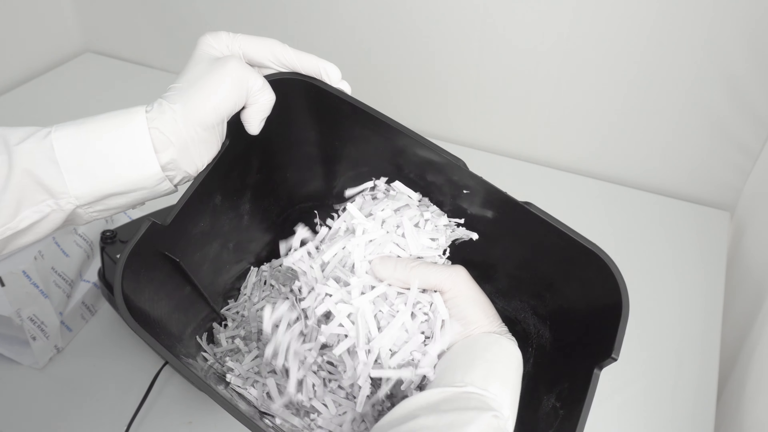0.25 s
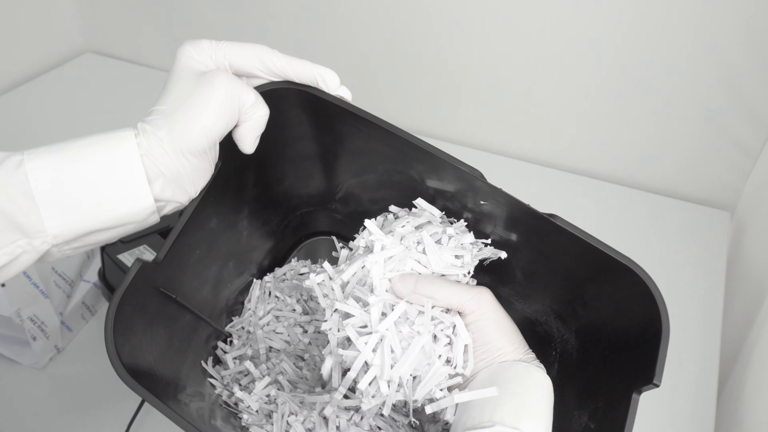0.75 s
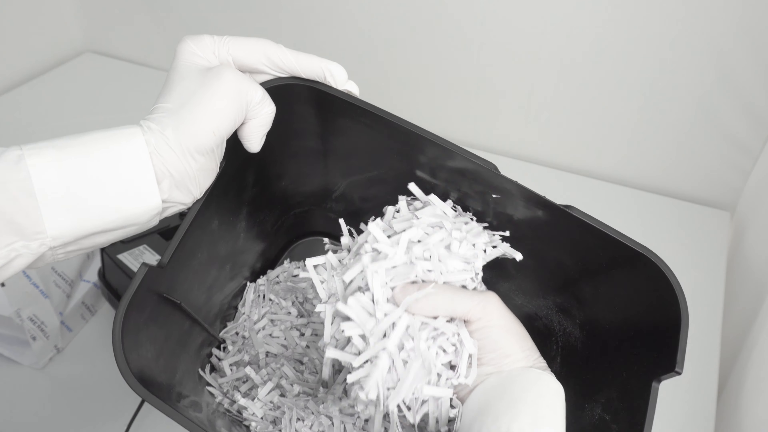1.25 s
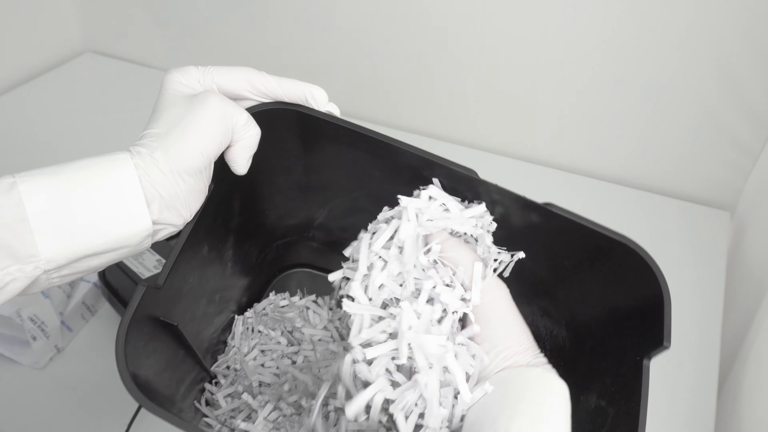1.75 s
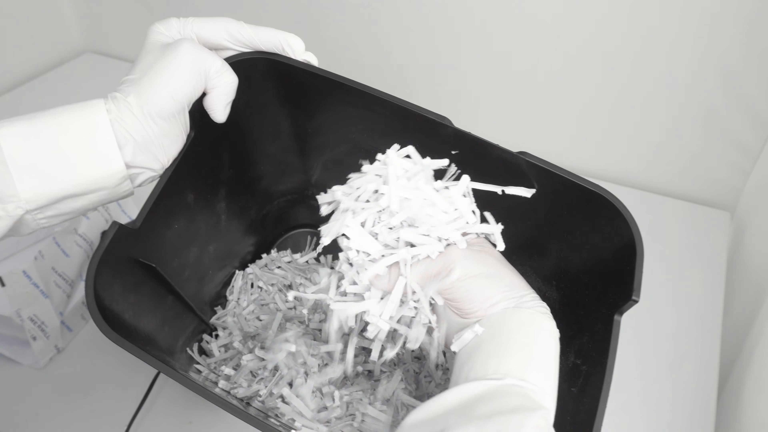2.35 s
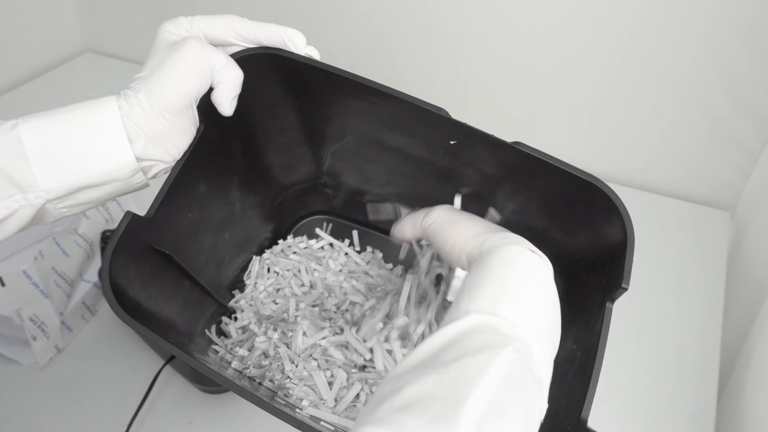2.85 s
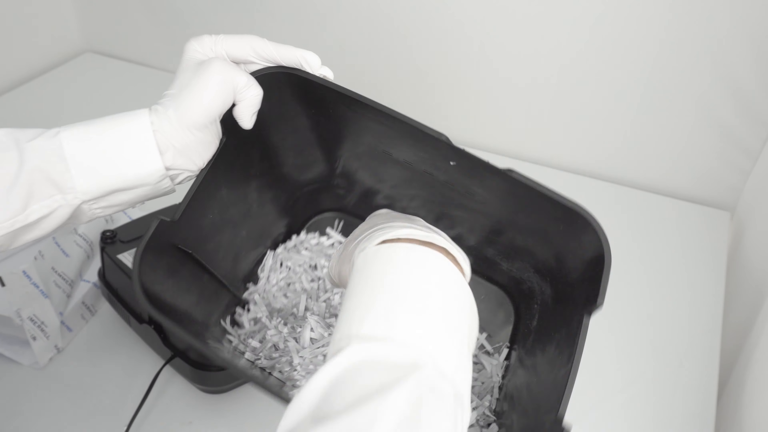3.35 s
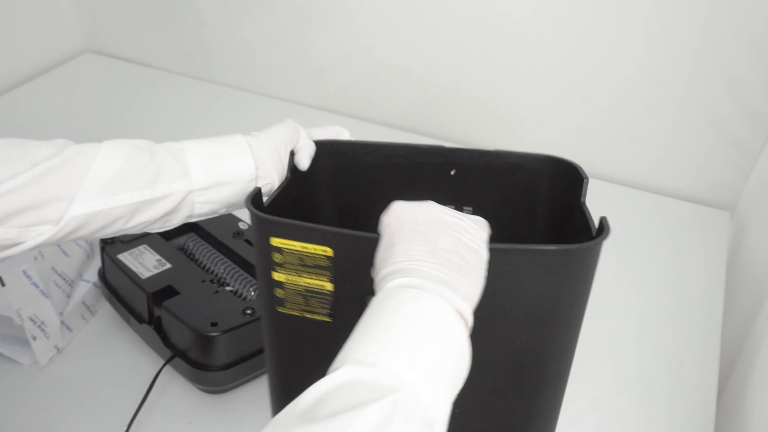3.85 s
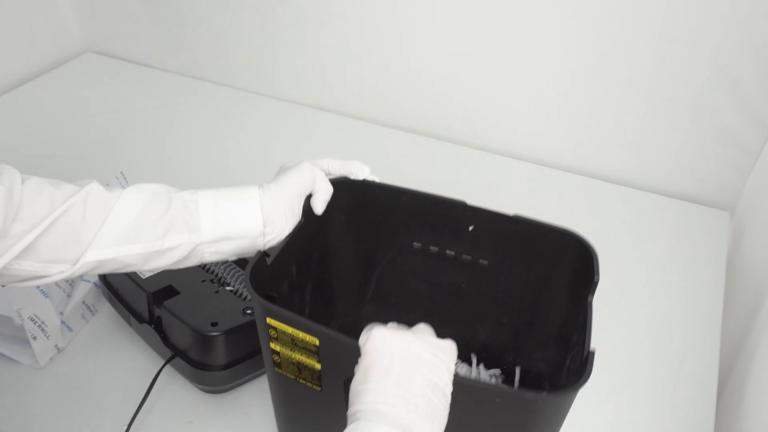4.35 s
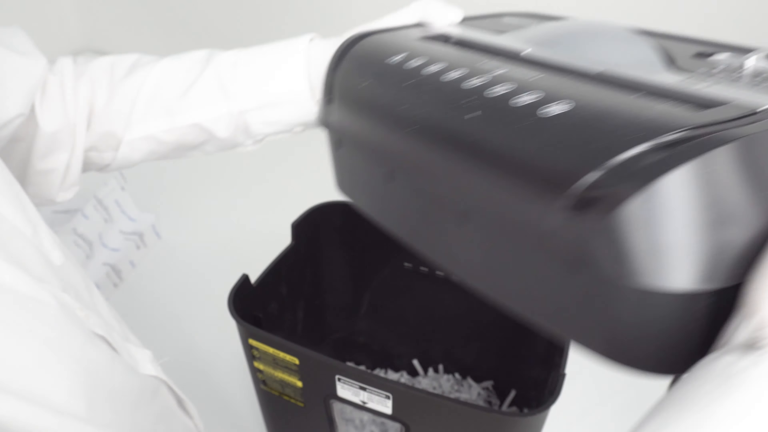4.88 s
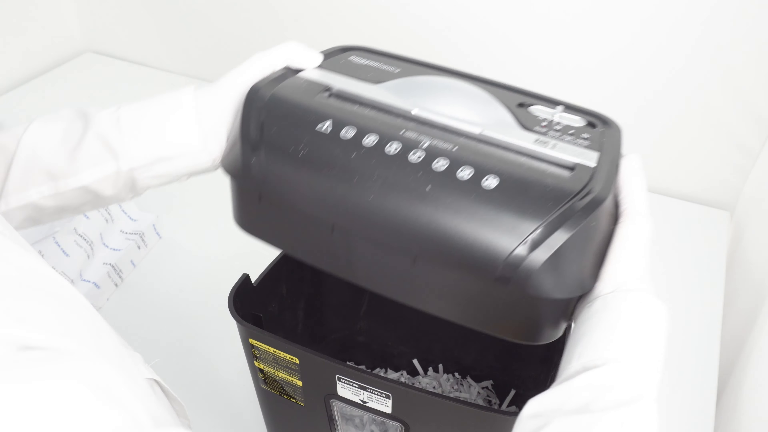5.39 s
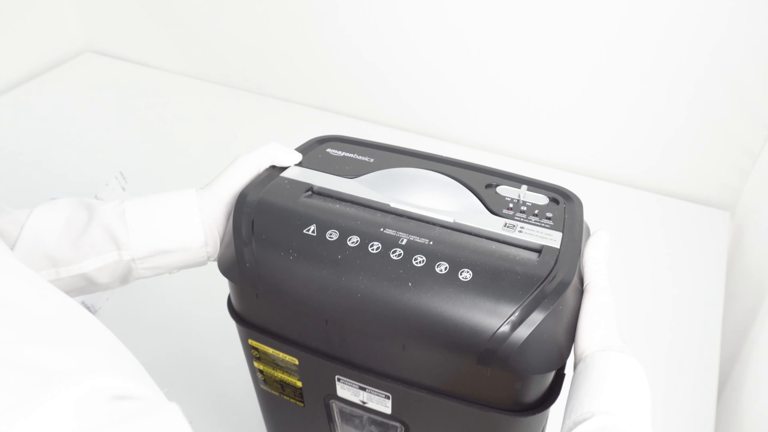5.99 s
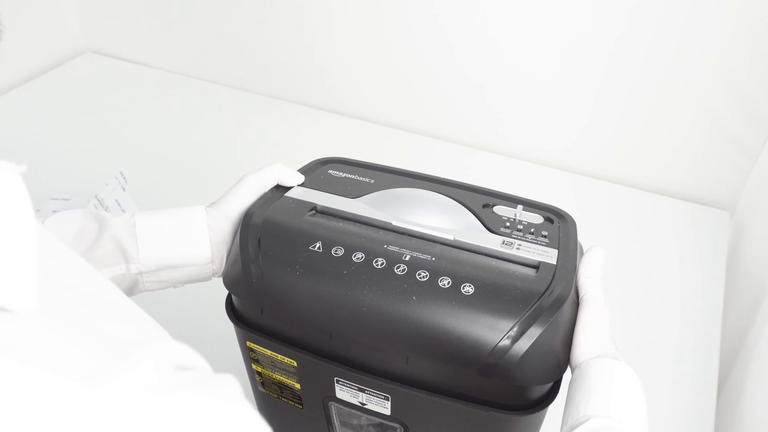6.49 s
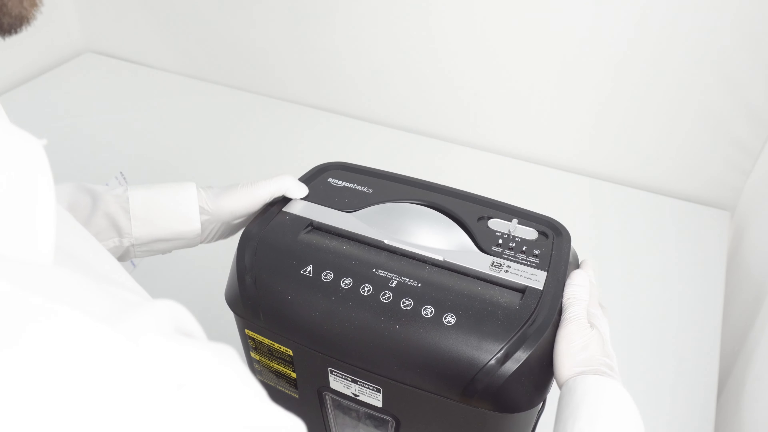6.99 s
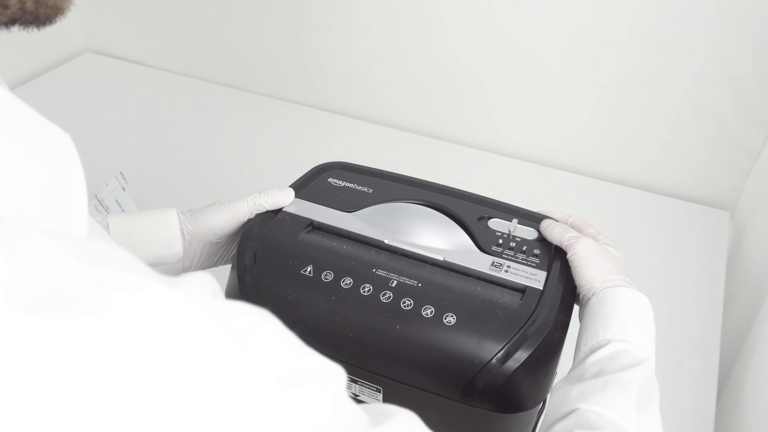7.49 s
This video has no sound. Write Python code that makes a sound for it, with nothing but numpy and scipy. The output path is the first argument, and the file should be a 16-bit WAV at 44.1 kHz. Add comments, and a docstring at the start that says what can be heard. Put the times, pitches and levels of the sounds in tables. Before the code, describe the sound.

Close up in a small hard room, gloved hands sift shredded paper with crisp fine crackling and little ticks against a plastic bin. The bin is stood on a table with soft thumps and a bright scraping rustle. Then a heavy plastic shredder head is fitted on top with loud hollow knocks, rubbing and clattering, ending almost silent.

```python
"""Shredded paper crackles finely as gloved hands sift it in a tilted plastic bin, stand the bin up on a
table and seat a heavy shredder head on its rim. Paper and scrapes are noise under swarms of tiny bursts;
knocks and rubbing drive ringing modes of the bin and the table top, with noise bursts for clacks and ticks.
A glove squeaks now and then in gliding tones, a low hum dies away early, and a small hard room answers
over a faint hush."""
import sys
import numpy as np
from scipy import signal
from scipy.fft import rfft, irfft, next_fast_len
from scipy.io import wavfile
from scipy.ndimage import uniform_filter1d

SR = 44100
rng = np.random.default_rng(int(sys.argv[2]) if len(sys.argv) > 2 else 0)


def unload_audio(sound):
    """Save the sound as a 16-bit wav file, at the path given as the first command line argument."""
    columns = np.transpose(np.atleast_2d(sound))
    # keep every value between -1 and 1, then stretch to whole-number steps
    steps = np.round(np.clip(columns, -1, 1) * 32767)
    wavfile.write(sys.argv[1], SR, steps.astype(np.int16))


def gain_from_decibels(decibels):
    """Convert decibel values to linear amplitude factors."""
    exponent = np.asarray(decibels, float) / 20
    return 10 ** exponent


N = 340893
TIME_S = np.arange(N) / SR
CONTROL_S = np.arange(0, N / SR, .001)  # slow levels are drawn each millisecond
SHARP_S, SHUDDER_S, SHUDDER_DB = .002, 0.19, -23  # rise and fall by 20 dB after a blow; level against the blow

# Slow work of the hands. Each row: time in seconds, fine paper and sleeve rustle in dB, coarse scrape in dB.
HAND_WORK = [(0.0, -37.5, -45), (0.16, -44, -53), (0.38, -45.5, -48.5), (0.53, -45.5, -54.5),
             (0.65, -52, -57.5), (1.19, -52, -60), (1.52, -36.5, -50.5), (1.99, -41, -49.5),
             (2.07, -34.5, -45.5), (2.47, -45, -52.5), (2.83, -84, -78), (3.1, -52, -45.5),
             (3.31, -88, -61), (3.48, -64.5, -66), (3.86, -44, -54), (4.29, -43, -50), (4.76, -54, -54.5),
             (4.96, -52.5, -52), (5.19, -63, -58), (5.68, -70, -62), (6.53, -72, -66), (7.22, -84.5, -65),
             (7.73, -69.5, -79.5)]
# Single sweeps of paper, glove or sleeve. Each row: peak in seconds, rise and fall by 20 dB in seconds,
# fine rustle in dB, coarse scrape in dB.
HAND_SWEEPS = [(2.68, 0.29, 0.25, -37.5, -46.5), (2.89, 0.11, 0.43, -32.5, -47),
               (3.06, 0.21, 0.069, -42.5, -41.5), (3.979, 0.096, 0.28, -33, -36),
               (4.119, 0.092, 0.12, -27, -29), (4.329, 0.054, 0.13, -37, -37), (4.56, 0.58, 0.27, -59, -44),
               (5.24, 0.079, .05, -52, -50), (5.45, 0.33, 0.17, -52, -49.5), (5.942, 0.075, 0.35, -65, -38),
               (6.35, 0.045, 0.16, -82, -40), (6.443, .1, 0.041, -52, -44), (6.85, 0.34, 0.13, -53, -41),
               (6.92, .15, 0.086, -59, -44), (7.15, 0.2, 0.066, -56.5, -55.5)]
# Sharp ticks of hard edges. Each row: time in seconds, tick in dB, rustle of the jolted paper in dB.
EDGE_TICKS = [(0.253, -25.5, -42.5), (0.502, -44, -43), (1.821, -35, -50), (1.878, -28, -59),
              (1.952, -37, -39), (2.626, -32, -42), (2.637, -41, -48), (2.736, -39, -48), (2.684, -35, -42),
              (2.872, -40, -35), (2.939, -41, -36), (3.066, -27.5, -40), (3.212, -39, -59),
              (3.228, -43.5, -58), (3.981, -26, -47), (4.007, -31, -50), (4.083, -21, -45),
              (4.12, -25, -43), (4.433, -36, -42), (5.304, -34, -56), (5.946, -41, -52), (5.957, -49, -44),
              (6.042, -51, -56), (6.162, -29.5, -49), (6.275, -38, -45.5), (6.858, -36, -38),
              (6.871, -18, -31), (6.892, -39, -48.5), (7.674, -63, -71)]
# Knocks on the bin. Each row: time in seconds, blow in dB, pitch near the struck spot in Hz, clack in dB.
BIN_KNOCKS = [(0.253, -37.5, 264, -36.5), (0.411, -49, 161, -44), (0.43, -35.5, 263, -57),
              (0.502, -64, 417, -47), (1.819, -41, 240, -48), (1.878, -40.5, 597, -35),
              (1.952, -34, 282, -34), (2.396, -40.5, 275, -43.5), (2.685, -36, 444, -39),
              (2.807, -41, 269, -43), (2.872, -50, 199, -42), (2.938, -29, 243, -41),
              (3.016, -29, 296, -42), (3.065, -48, 258, -37.5), (3.209, -54, 291, -49),
              (3.228, -32, 296, -42.5), (3.648, -33, 254, -50), (3.887, -54, 270, -71),
              (3.981, -42, 336, -32), (4.084, -29, 293, -31), (4.122, -22, 303, -34),
              (4.285, -31.5, 470, -59), (4.434, -20, 310, -29.5), (4.563, -12, 286, -32),
              (4.594, -13.5, 312, -55), (4.677, -13, 192, -35.5), (4.981, -57, 388, -43.5),
              (5.304, -17.5, 257, -31.5), (5.948, -27.5, 302, -33), (5.957, -9.5, 245, -23),
              (6.042, -10.5, 232, -29.5), (6.102, -20.5, 240, -60), (6.163, -15, 187, -32),
              (6.223, -32, 207, -41.5), (6.277, -26.5, 228, -30.5), (6.596, -35.5, 204, -48),
              (6.651, -35, 196, -67), (6.766, -18.5, 225, -36.5), (6.797, -32, 253, -53),
              (6.86, -10.5, 224, -20), (6.871, -17.5, 690, -25.5), (6.892, -12, 282, -24.5),
              (6.93, -13.5, 215, -34), (6.97, -17.5, 240, -39.5), (7.675, -48, 427, -42.5)]
# The bin or the head dragged under weight. Each row: peak in seconds, rise and fall by 20 dB in seconds,
# rubbing on the bin in dB, its pitch in Hz, shaking of the table in dB.
WEIGHT_DRAGS = [(0.01, .4, -50, 236, -57), (1.98, 0.4, -51.5, 274, -59), (3.8, 0.27, -52, 273, -61),
                (4.03, 0.25, -39, 285, -56), (4.691, 0.1, -22, 239, -44), (5.18, 0.29, -52.5, 383, -60),
                (5.42, 0.11, -47, 258, -70), (6.13, 0.1, -33, 257, -36), (6.33, 0.26, -34, 216, -40.5),
                (6.63, 0.18, -40.5, 211, -50), (1.72, 0.31, -74, 258, -59)]
# Spectrum of fine paper, for its shape alone. Each row: frequency in Hz, density in dB per Hz.
PAPER_COLOUR = [(880, -62), (1500, -4), (1640, -7), (2250, 2), (3660, 0), (4120, -0.5), (13100, 1.5),
                (16000, -1)]


def unit(x):
    """Scale to rms 1."""
    return x / np.sqrt(np.mean(x ** 2))


def colour(x, points):
    """Filter by (Hz, dB) points, keeping the level of white noise."""
    hz, db = np.transpose(points)
    size = next_fast_len(N)
    log_hz = np.log(np.fft.rfftfreq(size, 1 / SR) + 1)
    gain = gain_from_decibels(np.interp(log_hz, np.log(hz), db, left=-90, right=-90))
    return irfft(rfft(x, size) * unit(gain), size)[..., :N]


def walk(rate):
    """Random levels held 1 / rate seconds and slewed twice; rms near 1."""
    hold = int(SR / rate)
    steps = np.repeat(rng.standard_normal(N // hold + 1), hold)
    return unit(uniform_filter1d(uniform_filter1d(steps, hold), hold)[:N])


def fading(kicks, fade_s):
    """Each kick jumps up and decays exponentially, to 1/e in fade_s."""
    return signal.lfilter([1], [1, -np.exp(-1 / (fade_s * SR))], kicks)


def crackle(per_s, spread_db, grain_s):
    """Two noises under the same swarm of tiny bursts of very unequal size, at rms 1."""
    sizes = gain_from_decibels(spread_db * np.minimum(rng.exponential(size=N), 5.5))
    swarm = fading((rng.random(N) < per_s / SR) * sizes, grain_s)  # a power, hence the root
    return unit(np.sqrt(swarm) * rng.standard_normal((2, N)))


def bursts(starts, db, fade_s, points):
    """Coloured noise that starts sharply at each knock or tick and fades fast."""
    kicks = np.zeros(N)
    kicks[starts] = gain_from_decibels(db)
    return colour(fading(kicks, fade_s) * rng.standard_normal((2, N)), points)


def curve(s, db):
    """One row of power on the control times, straight in dB between the points."""
    return gain_from_decibels(np.interp(CONTROL_S, s, db))[None] ** 2


def swells(s, rise, fall, db):
    """Power of one swell a row: straight in dB, 20 dB up over the rise and 20 dB down over the fall."""
    late = CONTROL_S - np.asarray(s)[:, None]
    far = np.where(late < 0, -late / np.reshape(rise, (-1, 1)), late / np.reshape(fall, (-1, 1)))
    return gain_from_decibels(np.reshape(db, (-1, 1)) - 20 * far) ** 2


def blend(powers, hz=1.):
    """Summed level in dB and power-weighted pitch of the rows, at every sample."""
    total = powers.sum(axis=0)
    log_hz = (powers * np.log(np.reshape(hz, (-1, 1)))).sum(axis=0) / total
    level_db = np.interp(TIME_S, CONTROL_S, 10 * np.log10(total))
    return level_db, np.interp(TIME_S, CONTROL_S, np.exp(log_hz))


def mode(x, hz, t60):
    """One ringing mode, a two-pole resonance decaying by 60 dB in t60."""
    r, w = np.exp(-np.log(1000) / (t60 * SR)), 2 * np.pi * hz / SR
    return signal.lfilter([0, r * np.sin(w)], [1, -2 * r * np.cos(w), r * r], x)


def ring(modes, starts, blows, rub, scatter_db, reach_db):
    """Blows and rubbing, each as (dB, pitch Hz near the touched spot), set the same modes going."""
    out = 0
    chance = rng.random((len(starts), len(modes), 3))
    for k, (hz, db, t60) in enumerate(modes):
        # modes far in pitch from the touched spot answer less, by reach_db per octave
        blow, steady = (gain_from_decibels(db + level_db - reach_db * np.abs(np.log2(hz / spot_hz)))
                        for level_db, spot_hz in (blows, rub))
        # noise scaled so that long and short modes ring equally loud under rubbing
        push = steady * rng.standard_normal(N) / np.sqrt(t60 * SR / 4 / np.log(1000))
        # a blow reaches each mode within one cycle, with its own strength and sign
        late = np.minimum(starts + (chance[:, k, 0] * SR / hz).astype(int), N - 1)
        strength = gain_from_decibels(scatter_db * (2 * chance[:, k, 1] - 1.5))
        push[late] += blow * strength * np.sign(chance[:, k, 2] - .5)
        out = out + mode(push, hz, t60)
    return out


def fine_paper():
    """Fine crackle of paper and sleeve: dense tiny bursts that follow hands, sweeps and jolts."""
    s, hand_db, _ = np.transpose(HAND_WORK)
    sweep_s, rise, fall, sweep_db, _ = np.transpose(HAND_SWEEPS)
    tick_s, _, jolt_db = np.transpose(EDGE_TICKS)
    jolts = swells(tick_s, SHARP_S, 0.087, jolt_db)
    level_db, _ = blend(np.vstack([curve(s, hand_db), swells(sweep_s, rise, fall, sweep_db), jolts]))
    grains = crackle(per_s=2200, spread_db=4.9, grain_s=.0015)
    return gain_from_decibels(level_db + 0.47 * walk(29.87)) * colour(grains, PAPER_COLOUR)


def scrape_power():
    """Power of the coarse scraping, the slow hand work and the single sweeps together."""
    s, _, hand_db = np.transpose(HAND_WORK)
    sweep_s, rise, fall, _, sweep_db = np.transpose(HAND_SWEEPS)
    return np.vstack([curve(s, hand_db), swells(sweep_s, rise, fall, sweep_db)]).sum(axis=0)[None]


def coarse_scrape(power):
    """Coarse scraping: a sparser swarm of longer bursts with a duller spectrum."""
    # Spectrum of the scrape, for its shape alone. Each row: frequency in Hz, density in dB per Hz.
    scrape_colour = [(200, -70.5), (400, -4.5), (800, 1), (1400, 2), (2200, -0.5), (3500, -7),
                     (6000, -13.5), (9000, -42), (14000, -81)]
    grains = crackle(per_s=900, spread_db=3.1, grain_s=0.0022)
    return gain_from_decibels(blend(power)[0] + 2.15 * walk(35)) * colour(grains, scrape_colour)


def bin_walls(power):
    """Thin plastic walls: modes set ringing by knocks, by rubbing and by a shudder after each blow."""
    # Modes of the bin. Each row: frequency in Hz, level in dB, 60 dB decay in seconds.
    bin_modes = [(167.6, -8.5, 0.17), (186.4, -6, 0.18), (203.3, -1.5, 0.23), (220, -3, 0.14),
                 (239.2, -2.5, 0.21), (258, -11.5, 0.27), (280.5, 2, 0.12), (301.2, -5.5, 0.14),
                 (336, 0.5, 0.06), (379, -1.5, 0.21), (415, 0, 0.14), (475.3, -2, 0.08), (541.7, 1, 0.09),
                 (600.3, 2, 0.1), (666.3, 4, 0.09), (714.4, 5, 0.05), (790, 1, 0.07), (844, 2, 0.09),
                 (924, 2, 0.08), (1058, 1, 0.06), (1200, 2, 0.06), (1354, 6, .07), (1495, 4, .07),
                 (1830, 6, 0.05), (2120, 3, 0.06)]
    s, blow_db, spot_hz, _ = np.transpose(BIN_KNOCKS)
    drag_s, drag_len, drag_db, drag_hz, _ = np.transpose(WEIGHT_DRAGS)
    scrape_db, scrape_hz = -9.5, 262  # rubbing that goes with the coarse scrape
    rubbing = np.vstack([power * gain_from_decibels(scrape_db) ** 2,
                         swells(drag_s, drag_len, drag_len, drag_db),
                         swells(s, SHARP_S, SHUDDER_S, blow_db + SHUDDER_DB)])
    rub_db, rub_hz = blend(rubbing, np.r_[scrape_hz, drag_hz, spot_hz])
    rub = rub_db + 3.9 * walk(40), rub_hz
    walls = ring(bin_modes, (s * SR).astype(int), (blow_db, spot_hz), rub, scatter_db=4.0, reach_db=13)
    # thin walls cannot radiate below their lowest mode
    return signal.sosfilt(signal.butter(4, 150, "high", fs=SR, output="sos"), walls)


def table_top():
    """Table top: low modes set going by thumps, drags, shudders and a faint constant shaking."""
    # Modes of the table top. Each row: frequency in Hz, level in dB, 60 dB decay in seconds.
    table_modes = [(40.8, 3, 1.57), (62.7, 6, 0.53), (70, 5.5, 0.059), (88, 5, 0.06), (105, -1.5, 0.2),
                   (129.8, 8, 0.27), (163, -29, 0.26)]
    # Thumps into the table top. Each row: time in seconds, level in dB, pitch in Hz.
    thumps = [(3.23, -51, 110), (3.647, -32.5, 92), (3.884, -31.5, 80), (4.562, -29, 98), (4.594, -29, 70),
              (4.676, -35, 115), (5.303, -43.5, 120), (5.957, -27, 112), (6.102, -36, 105),
              (6.282, -32.5, 103), (6.767, -32, 108), (6.797, -32, 108), (6.859, -23, 109),
              (6.892, -24.5, 52), (6.942, -27.5, 126)]
    s, thump_db, thump_hz = np.transpose(thumps)
    drag_s, drag_len, _, _, shake_db = np.transpose(WEIGHT_DRAGS)
    idle_db, idle_hz, drag_hz = -65, 88, 105.4
    shaking = np.vstack([np.full((1, len(CONTROL_S)), gain_from_decibels(idle_db) ** 2),
                         swells(drag_s, drag_len, drag_len, shake_db),
                         swells(s, SHARP_S, SHUDDER_S, thump_db + SHUDDER_DB)])
    load_db, load_hz = blend(shaking, np.r_[idle_hz, np.full_like(drag_s, drag_hz), thump_hz])
    load = load_db + 3.3 * walk(10), load_hz
    return ring(table_modes, (s * SR).astype(int), (thump_db, thump_hz), load, scatter_db=1.0, reach_db=15.4)


def clacks():
    """Each knock is a snap of noise and a weaker, longer rattle of loose plastic."""
    # Spectrum of a clack, for its shape alone. Each row: frequency in Hz, density in dB per Hz.
    clack_colour = [(200, -81.5), (450, -15.5), (700, 0.5), (1400, 1), (2200, -1), (3500, -13),
                    (6000, -19.5), (9000, -29.5), (14000, -80)]
    s, _, _, clack_db = np.transpose(BIN_KNOCKS)
    starts = (s * SR).astype(int)
    return bursts(starts, clack_db, 0.014, clack_colour) + bursts(starts, clack_db - 5.5, 0.042, clack_colour)


def edge_ticks():
    """Hard edges tick: a bare impulse, a very short bright burst and a weaker, longer one."""
    # Spectrum of a tick, for its shape alone. Each row: frequency in Hz, density in dB per Hz.
    tick_colour = [(1000, -51.5), (1900, 13), (2500, 27), (4500, 25), (8000, 11), (12000, -1),
                   (16000, -37.5)]
    s, tick_db, _ = np.transpose(EDGE_TICKS)
    starts = (s * SR).astype(int)
    snaps = np.zeros(N)
    snaps[starts] = gain_from_decibels(tick_db + 9)
    noise = bursts(starts, tick_db, .0015, tick_colour) + bursts(starts, tick_db - 7.5, 0.016, tick_colour)
    return noise + colour(snaps, PAPER_COLOUR)


def squeaks():
    """Rubber sticking and slipping on plastic: an arched, wavering tone with a weak half line and octave."""
    # Glove squeaks. Each row: start in seconds, length in seconds, start pitch in Hz, end pitch in Hz,
    # level in dB, roughness from 0 to 1.
    glove_squeaks = [(0.305, .085, 2450, 2800, -43, .8), (3.248, .05, 2580, 2520, -48, .1),
                     (3.75, .06, 2950, 2950, -58, .2), (5.235, .055, 3100, 2450, -56, .7),
                     (5.395, .105, 2890, 2820, -51, .1), (5.51, .025, 2950, 2900, -54, .1)]
    out, waver, flutter = np.zeros(N), walk(300), walk(121)
    for s, length, from_hz, to_hz, db, rough in glove_squeaks:
        span = slice(int(s * SR), int((s + length) * SR))
        u = (TIME_S[span] - s) / length
        # pitch rises by this share in mid-squeak, where the glove presses hardest
        arch = 0.0482 * np.sin(np.pi * u)
        hz = (from_hz + (to_hz - from_hz) * u) * (1 + arch + 0.059 * rough * waver[span])
        phase = 2 * np.pi * np.cumsum(hz) / SR
        tone = np.sin(phase) + 0.3 * np.sin(phase / 2) + .3 * np.sin(2 * phase)
        level = gain_from_decibels(db + 5.5 * rough * flutter[span])
        out[span] += level * np.sqrt(np.abs(np.sin(np.pi * u))) * tone
    return out


def hum():
    """A low sine, wavering in pitch and level, that dies away early."""
    end_s, hz, db = 0.543, 106, -44.5
    level = gain_from_decibels(db + 2.2 * walk(13.0)) * np.clip((end_s - TIME_S) / 0.073, 0, 1)
    return level * np.sin(2 * np.pi * np.cumsum(hz + 2.7 * walk(6.4)) / SR)


def room(x):
    """Close hard walls: a dense decaying noise tail, another one for each row, fed with dulled sound."""
    t60_s, level_db, top_hz = 0.43, -7, 5900
    t = np.arange(int(.7 * SR)) / SR
    decay = np.exp(-np.log(1000) * t / t60_s) * np.minimum(t / 0.0052, 1)
    tail = unit(rng.standard_normal((2, len(t))) * decay) / np.sqrt(len(t))
    x = signal.lfilter(*signal.butter(1, top_hz, fs=SR), x)
    return gain_from_decibels(level_db) * signal.fftconvolve(x[None], tail, axes=1)[:, :N]


def hush():
    """Faint steady background: coloured noise, independent in the two rows."""
    # Spectrum of the hush, for its shape alone. Each row: frequency in Hz, density in dB per Hz.
    hush_colour = [(41, -27), (70, -19), (101, 4.5), (155, -5), (300, -6), (430, -10), (600, -17),
                   (3190, -27.5), (13600, -27), (16000, -38)]
    return gain_from_decibels(-57.5) * colour(rng.standard_normal((2, N)), hush_colour)


def ports(mid, other):
    """Two close microphone ports: long waves reach both alike, short ones differ."""
    side = signal.lfilter(*signal.butter(1, 1500, "high", fs=SR), gain_from_decibels(-4) * other)
    # middle pitches lean to the right, where the hand works
    side -= .15 * signal.lfilter(*signal.butter(1, (900, 4000), "band", fs=SR), mid)
    return np.array([mid + side, mid - side])


def scene():
    """All sources as a sum row and a difference row, then turned into left and right."""
    power = scrape_power()
    near = fine_paper() + coarse_scrape(power) + clacks() + edge_ticks()
    near[0] += bin_walls(power) + table_top() + squeaks() + hum()
    mid, other = near + room(near[0]) + hush()
    return ports(mid, other)


def top_cut(x):
    """Nothing passes above the cut-off."""
    return signal.sosfilt(signal.butter(12, 17060, fs=SR, output="sos"), x)


def record(dry):
    """A small camera microphone, deaf to the deepest bass, that rounds the loudest peaks."""
    mix = signal.sosfilt(signal.butter(2, 27, "high", fs=SR, output="sos"), dry)
    mix = np.tanh(1.1 * mix) / 1.1
    return top_cut(mix)


dry = scene()
out = record(dry)
unload_audio(out)
```